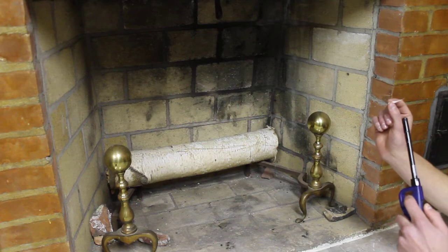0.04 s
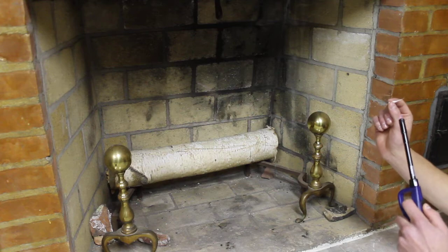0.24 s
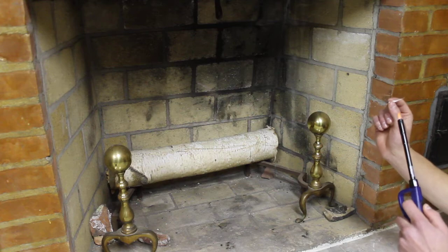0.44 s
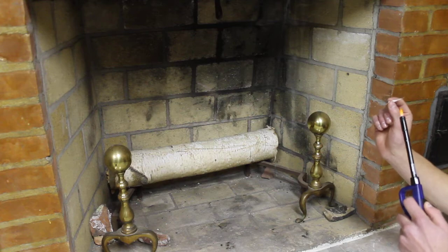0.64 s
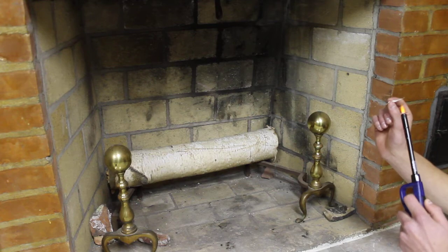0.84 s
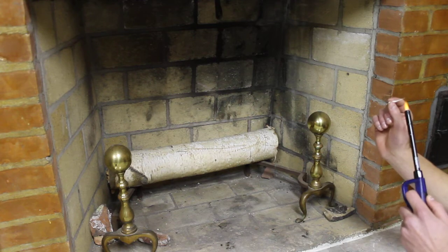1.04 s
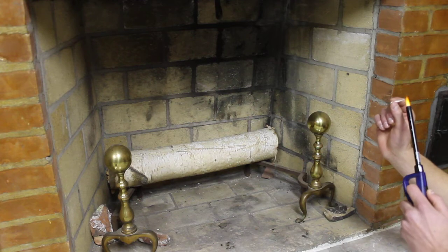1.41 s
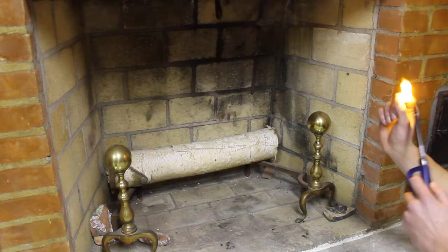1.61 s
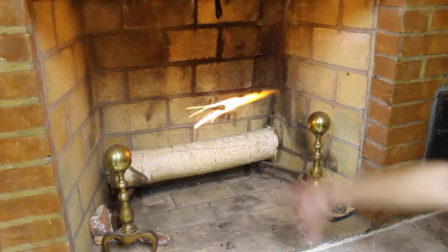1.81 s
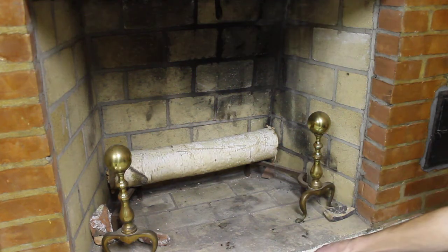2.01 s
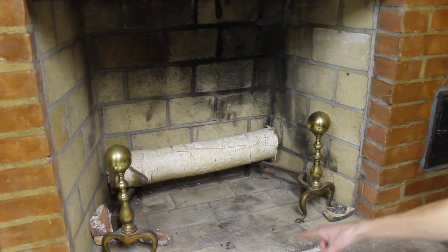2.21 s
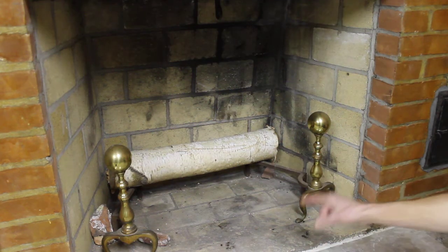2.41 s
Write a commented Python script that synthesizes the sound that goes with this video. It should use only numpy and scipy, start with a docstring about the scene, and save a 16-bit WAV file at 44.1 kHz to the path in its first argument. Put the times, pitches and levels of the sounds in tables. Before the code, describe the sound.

A lighter clicks, then a sudden whoosh of flame flares up in a fireplace.

```python
"""A quiet room, one microphone near a brick fireplace. A long-necked lighter hisses, its hammer
snaps and rings the case, and a small flame burns softly. A handful of gas catches with a hiss,
cracks and flares into a fireball whose roar darkens as it grows and rings the firebox.
A soft thump follows. The room adds a short tail; faint room tone and mains hum lie behind it all."""
import sys
import numpy as np
from scipy import signal
from scipy.fft import rfft, irfft
from scipy.io import wavfile
from scipy.ndimage import uniform_filter1d

SR = 44100
rng = np.random.default_rng(int(sys.argv[2]) if len(sys.argv) > 2 else 0)


def materialize(psi):
    """Save the field psi as 16-bit PCM at rate SR to the path in sys.argv[1].

    A 1-D psi becomes a single channel; in a 2-D psi each row is a channel.
    """
    bounded = np.clip(np.atleast_2d(psi).T, -1, 1)
    quanta = np.round(bounded * 32767).astype(np.int16)
    wavfile.write(sys.argv[1], SR, quanta)


N = 112454

# decay of the room: (frequency [Hz], t60 [s])
ROOM_DECAY = [(150, 0.35), (1200, 0.41), (3500, 0.33), (7000, 0.19), (14000, .18)]
# room tone at the microphone: (frequency [Hz], spectral level [dB])
ROOM_TONE_COLOUR = [(25, -18.5), (60, -16.5), (110, -9.5), (200, -2.5), (300, -5), (460, -3.5), (900, -10),
                    (1600, -9), (2500, -13.5), (7000, -18), (11000, -25), (16000, -27)]
# soft thumps as the arm drops away: (time [s], level [dB], t60 [s])
THUMP_HITS = [(2.113, -22.5, 0.12), (2.125, -23, 0.4), (2.15, -32.5, 0.27)]
# their dull tone: (frequency [Hz], spectral level [dB])
THUMP_SPECTRUM = [(60, -19.5), (140, -13), (215, 3.5), (330, -6), (520, -1), (900, -3), (1400, -17.5),
                  (3500, -21), (10000, -40)]
# ticks of the trigger and the hand: (time [s], level [dB], centre [Hz], t60 [s])
TRIGGER_TICKS = [(.003, -27, 1614, 0.12), (.063, -28.5, 1600, 0.032), (.106, -34, 6500, 0.0202),
                 (.1065, -29.5, 2600, 0.018), (.1085, -23, 1350, 0.023), (.110, -25.5, 800, .06),
                 (0.707, -30.5, 3960, .014), (0.712, -31.5, 4460, .012), (2.454, -36.5, 1700, 0.043)]
# unlit gas leaving the nozzle: (frequency [Hz], spectral level [dB])
JET_COLOUR = [(500, -13), (3000, -8), (7000, -8), (9700, -2.5), (12000, -18), (16000, -35)]
# blows of the igniter's hammer: (time [s], level [dB])
HAMMER_BLOWS = [(0.2284, 0), (0.2291, -6), (.2312, -7), (0.2334, -3)]
# their bright tone: (frequency [Hz], spectral level [dB])
HAMMER_COLOUR = [(30, -32), (80, -24), (200, -15), (520, -14), (800, -6.5), (1150, -4), (2400, -2),
                 (5000, -4), (7500, -0.5), (10500, -2.5), (13000, -12.5), (15500, -15.5)]
# resonances of the lighter's case: (frequency [Hz], width [Hz], lift [dB])
CASE_MODES = [(799, 170, 6), (1335, 250, 8), (2270, 350, 4.5), (2985, 55, 5.5), (3630, 125, 11.5),
              (3630, 78, 5), (4500, 150, 3.5), (6330, 130, 4.5), (6337, 70, 9.5), (7450, 460, 5),
              (8950, 110, 2.5)]
# rush of the lighter's flame: (frequency [Hz], spectral level [dB])
SMALL_FLAME_COLOUR = [(60, -22), (120, -6), (160, -10), (200, -1), (300, -7.5), (550, 2), (1000, -3),
                      (2200, -9.5), (4200, -10.5), (6500, -27.5), (15000, -26.5)]
# hiss of the gas catching: (frequency [Hz], spectral level [dB])
CATCH_COLOUR = [(60, -22), (170, -7.5), (450, -3.5), (1300, 0), (2000, -1), (4500, -4), (7000, -10),
                (10000, -18.5), (15500, -28)]
# cracks as the flame front breaks out: (time [s], level [dB])
FRONT_CRACKS = [(1.7514, -2), (1.7562, -3)]
# their sharp tone: (frequency [Hz], spectral level [dB])
CRACK_SPECTRUM = [(100, -20), (1000, -19), (1900, 0.5), (4000, 2.5), (6500, -3), (9000, -4), (12000, -18),
                  (15500, -10.5)]
# the roar, low bands peaking last: (centre [Hz], level [dB], attack [s], hold [s], t60 [s])
ROAR_BANDS = [(69.5, -70, .025, 0.07, 0.29), (175, -42.5, 0.037, 0.022, .15), (449, -35, .02, .018, 0.14),
              (1000, -29, .015, .024, 0.077), (1970, -32, 0.016, 0.025, .11),
              (4140, -38, 0.013, 0.011, .19), (8900, -44, 0.0049, 0.015, 0.28)]
# the last of the gas burning off: (frequency [Hz], spectral level [dB])
BURNOFF_COLOUR = [(80, -29), (170, -6.5), (450, 1), (1300, -4.5), (2500, -11.5), (5000, -16.5),
                  (10000, -21.5), (15500, -38)]
# resonances of the firebox: (frequency [Hz], width [Hz], lift [dB])
FIREBOX_MODES = [(156.4, 17.5, 8.5), (235.7, 13, 5), (403, 36, 10.5), (477.7, 35, -0.5), (552, 28, 6.5),
                 (718, 23.5, 3.5), (920, 57, 6), (1011, 26, 8.5), (1189, 26.5, 11.5), (1357, 31, 9),
                 (1507, 24, 9), (2048, 26.3, 9)]

SNAP_S, CATCH_S, FLARE_S, BURNOFF_S = HAMMER_BLOWS[0][0], 1.5805, 1.751, 1.815


def undb(db):
    """Decibels to gain."""
    return 10 ** (np.asarray(db) / 20)


def unit(x):
    """Scale to unit energy."""
    return x / np.sqrt(np.sum(x ** 2) + 1e-18)


def fade(t, t60):
    """Exponential decay by 60 dB in t60 seconds."""
    return np.exp(-np.log(1000) * np.minimum(t / t60, 10))


def envelope(start, attack, hold, t60):
    """Straight attack, hold, exponential release, all in seconds."""
    t = np.arange(N) / SR - start
    return np.clip(t / attack, 0, 1) * fade(np.maximum(t - attack - hold, 0), t60)


def at(start, x):
    """Put a short sound on the timeline."""
    return np.concatenate([np.zeros(max(int(start * SR), 0)), x, np.zeros(N)])[:N]


def convolve(x, response):
    """Play a sound through an impulse response."""
    return signal.oaconvolve(x, response)[:N]


def along(points, hz):
    """Read a table on a log-frequency axis."""
    table = np.array(points, float)
    return np.interp(np.log(hz + 1), np.log(table[:, 0]), table[:, 1])


def causal(db_at, size=4096):
    """Minimum-phase response with a given dB curve."""
    freqs = np.fft.rfftfreq(size, 1 / SR)
    cepstrum = irfft(np.log(undb(db_at(freqs))))
    cepstrum[1:size // 2] *= 2
    cepstrum[size // 2 + 1:] = 0
    return irfft(np.exp(rfft(cepstrum)))


def colour(points):
    """Unit-energy response for a table of (frequency [Hz], spectral level [dB])."""
    return unit(causal(lambda f: along(points, f)))


def band(hz, octaves):
    """Unit-energy response of a bell-shaped band."""
    return unit(causal(lambda f: np.maximum(-2 * (np.log2((f + 1) / hz) / octaves) ** 2, -70)))


def body(modes):
    """Response of a body that rings at its resonances."""
    def lift_db(f):
        return sum(db / (1 + (2 * (f - hz) / width) ** 2) for hz, width, db in modes)
    return causal(lift_db, size=16384)


def ring(hz, t60, size=32768):
    """Unit-energy response of one decaying mode."""
    t = np.arange(size) / SR
    return unit(np.sin(2 * np.pi * hz * t) * fade(t, t60))


def noise(response):
    """White noise coloured by a response."""
    return convolve(rng.standard_normal(N), response)


def burst(t60, size=8192):
    """A dying spray of micro-impacts with a nearly flat spectrum and unit energy."""
    t = np.arange(size) / SR
    spectrum = rfft(rng.standard_normal(size) * fade(t, t60))
    whitened = irfft(spectrum / (np.abs(spectrum) + 1e-12))
    return unit(whitened * fade(t, 10 * t60))


def flutter(hz, depth_db):
    """Turbulent flicker: the gain glides to a new random level hz times a second."""
    span = int(SR / hz)
    steps = np.repeat(rng.standard_normal(N)[:N // span + 1], span)
    return undb(depth_db * uniform_filter1d(steps, span)[:N])


def even(response):
    """Tame the strongest peaks of a response, as many overlapping echoes do."""
    spectrum = rfft(response)
    magnitude = np.abs(spectrum)
    tamed = irfft(spectrum / np.hypot(magnitude, magnitude.mean()))
    return unit(tamed[:len(response) // 2])


def room(size=32768, build_s=0.0075):
    """Dense early reflections off the bricks, then a tail whose treble dies first."""
    t, freqs = np.arange(size) / SR, np.fft.rfftfreq(size, 1 / SR)
    tail_spectrum = rfft(rng.standard_normal(size))
    echoes = undb(6) * rng.standard_normal(size) * fade(t, t60=0.084)
    for centre, t60 in ROOM_DECAY:
        share = along([(hz, hz == centre) for hz, _ in ROOM_DECAY], freqs)
        echoes += irfft(tail_spectrum * share) * fade(t, t60)
    return even(echoes * np.clip(t / build_s, 0, 1))


def at_microphone(x, walls, wet_db):
    """Direct sound plus the room; the less room, the nearer it seems."""
    return x + undb(wet_db) * convolve(x, walls)


def room_tone(hum_hz=60):
    """Far in the background: quiet air with a trace of mains hum."""
    hum = np.sin(2 * np.pi * hum_hz * np.arange(N) / SR)
    return undb(-61) * noise(colour(ROOM_TONE_COLOUR)) + undb(-78) * hum


def thump(walls):
    """The arm drops away: soft bumps run together, with a low ring."""
    bumps = sum(at(s, undb(db) * burst(t60)) for s, db, t60 in THUMP_HITS)
    thud = convolve(bumps, colour(THUMP_SPECTRUM))
    low_ring = undb(-5.5) * convolve(bumps, ring(hz=211, t60=0.43))
    return at_microphone(thud, walls, wet_db=-3) + low_ring


def lighter(walls):
    """Gas hisses, the trigger ticks, then the igniter's hammer strikes, rebounds and rings the case."""
    tone = colour(HAMMER_COLOUR)
    blows = sum(at(s, undb(db) * burst(t60=0.009)) for s, db in HAMMER_BLOWS)
    snap = undb(3.5) * convolve(blows, tone)
    blur = convolve(burst(t60=0.025), tone)  # the room smears the blows into one
    tail = undb(9) * at(SNAP_S, convolve(blur, walls))
    ticks = sum(at(s, undb(db) * convolve(burst(t60), band(hz, octaves=0.54)))
                for s, db, hz, t60 in TRIGGER_TICKS)
    jet = undb(-64.5) * noise(colour(JET_COLOUR)) * envelope(0, attack=0.002, hold=SNAP_S, t60=0.1)
    return convolve(snap, body(CASE_MODES)) + tail + at_microphone(ticks, walls, wet_db=-2.5) + jet


def lighter_flame():
    """The small flame rushes softly from the snap until just after the flare."""
    burning = envelope(SNAP_S, attack=0.088, hold=1.6216, t60=0.26)
    return undb(-61.5) * noise(colour(SMALL_FLAME_COLOUR)) * flutter(hz=24.87, depth_db=1.25) * burning


def gas_catching():
    """The gas catches with a short hiss and simmers until it flares."""
    catching = undb(-47) * envelope(CATCH_S, attack=0.002, hold=0.039, t60=0.063)
    simmer = undb(-52) * envelope(CATCH_S, attack=0.014, hold=FLARE_S - CATCH_S, t60=0.05)
    return noise(colour(CATCH_COLOUR)) * np.hypot(catching, simmer) * flutter(hz=200, depth_db=1.0)


def fireball(walls):
    """In the foreground the gas catches, cracks as the flame front breaks out, roars and burns off."""
    catch = gas_catching()
    front = sum(at(s, undb(db) * burst(t60=0.022)) for s, db in FRONT_CRACKS)
    cracks = convolve(front, colour(CRACK_SPECTRUM))
    roar = np.zeros(N)
    for hz, db, attack, hold, t60 in ROAR_BANDS:
        swell = envelope(FLARE_S, attack, hold, 2 * t60) ** 2  # curved rise, then a decay in t60
        roar += undb(db) * noise(band(hz, octaves=0.4)) * swell
    dying = envelope(BURNOFF_S, attack=0.019, hold=0.048, t60=0.31)
    burnoff = undb(-46) * noise(colour(BURNOFF_COLOUR)) * dying
    flame = catch + (roar + burnoff) * flutter(hz=168.3, depth_db=2.85)
    return at_microphone(flame, walls, wet_db=-5) + at_microphone(cracks, walls, wet_db=-5.5)


def scene():
    """One microphone hears all sources in one room; the flames sound through the firebox."""
    walls = room()
    flames = convolve(lighter_flame() + fireball(walls), body(FIREBOX_MODES))
    return (lighter(walls) + flames + thump(walls) + room_tone())[None]


def record(dry):
    """The recorder cuts the top steeply above 16 kHz."""
    return signal.sosfilt(signal.ellip(10, 0.2, 70, 16000, fs=SR, output="sos"), dry)


dry = scene()
out = record(dry)
materialize(out)
```